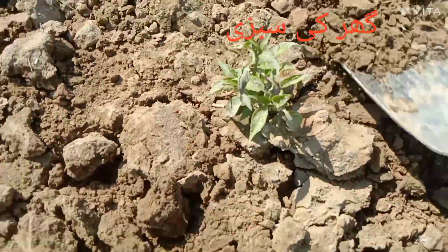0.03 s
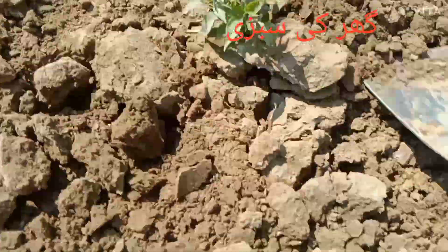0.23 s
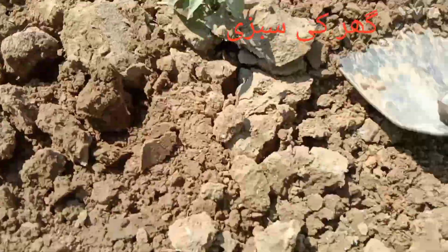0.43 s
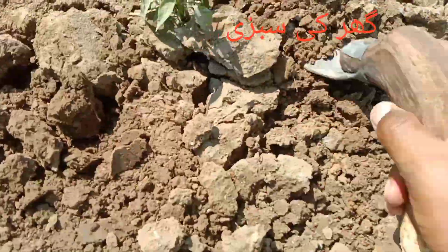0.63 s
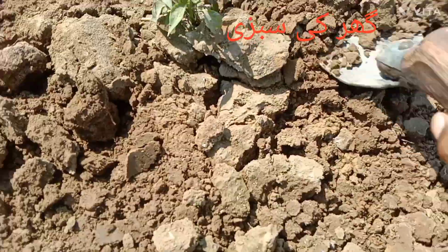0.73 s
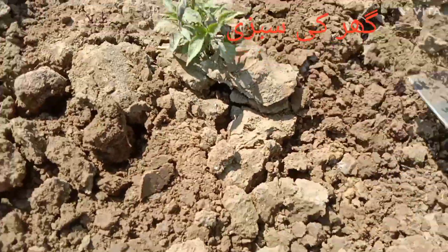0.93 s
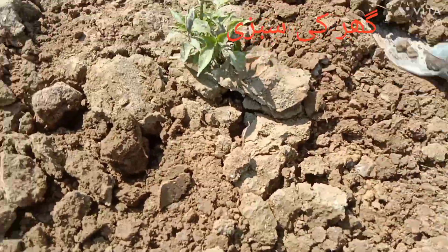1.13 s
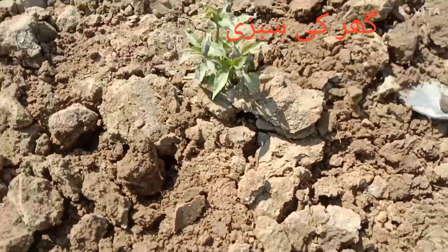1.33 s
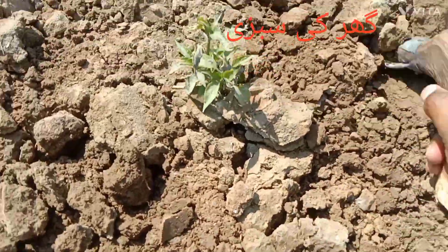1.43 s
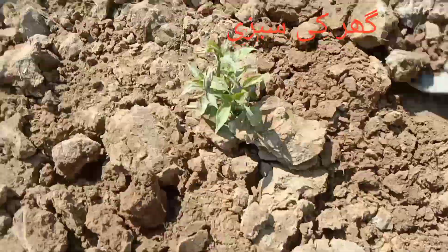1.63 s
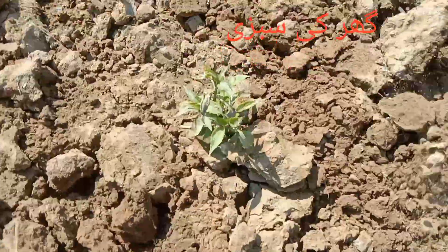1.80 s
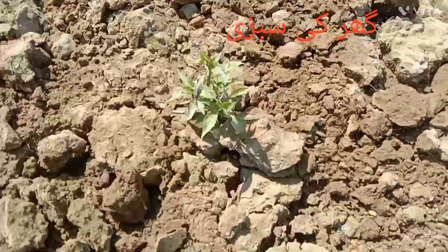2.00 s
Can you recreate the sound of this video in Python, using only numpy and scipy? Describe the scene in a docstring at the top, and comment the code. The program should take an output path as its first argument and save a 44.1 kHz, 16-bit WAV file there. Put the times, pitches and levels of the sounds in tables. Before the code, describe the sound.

Close up, a steel hand hoe rasps through dry garden soil in short irregular strokes, the blade ringing thinly, stones snapping and clods crunching, over a very faint low outdoor rumble; close single microphone.

```python
"""In the open air, close by, a steel hand hoe works dry, cloddy garden soil in short, uneven strokes.
Random grains, filtered into rasp, crunch and fizz, follow each stroke and excite the blade's partials.
Filtered noise bursts are the snaps of small stones and the hollow crunches of breaking clods.
Knocks set off freely decaying partials, and catches of the edge sing as single swelling sines.
Low-pitched grains make the soft thud of shoved soil; noise makes a faint low rumble underneath."""
import sys
import numpy as np
from scipy import signal
from scipy.fft import rfft, irfft
from scipy.io import wavfile

SR = 44100
rng = np.random.default_rng(int(sys.argv[2]) if len(sys.argv) > 2 else 0)


def dump_mix(stems):
    """Bounce the given channels to the path in sys.argv[1] as a 16-bit WAV at rate SR."""
    frames = np.atleast_2d(stems).T  # one column per channel
    limited = np.clip(frames, -1, 1)  # hard clip at full scale
    pcm = np.round(limited * 32767).astype(np.int16)
    wavfile.write(sys.argv[1], SR, pcm)


N = 90890  # samples

# Strokes of the hoe: (full contact from [s], held for [s], rise [s per 20 dB], fall [s per 20 dB],
# rasp level [dB], crunch level [dB], blade ring level [dB])
STROKES = [ (0.003, 0.060, 0.020, 0.030, -53, -62, -47), (0.072, 0.029, 0.008, 0.020, -40, -44, -35),
           (0.124, 0.007, 0.008, 0.018, -38, -49, -44), (0.150, 0.065, 0.020, 0.095, -56, -62, -57),
           (0.303, 0.013, 0.014, 0.018, -45, -47, -56), (0.358, 0.023, 0.010, 0.020, -40, -46, -44),
           (0.394, 0.012, 0.045, 0.010, -29, -38, -35), (0.443, 0.083, 0.030, 0.020, -36, -46.5, -42),
           (0.535, 0.032, 0.010, 0.018, -39, -53, -52), (0.655, 0.055, 0.062, 0.115, -37.5, -72, -48),
           (0.786, 0.088, 0.045, 0.032, -35.5, -45, -41), (0.936, 0.089, 0.012, 0.025, -48.5, -73, -58),
           (1.084, 0.028, 0.036, 0.034, -43, -52, -38), (1.168, 0.012, 0.024, 0.034, -50, -55, -42),
           (1.237, 0.038, 0.002, 0.022, -39.5, -47.5, -41.5), (1.332, 0.026, 0.016, 0.015, -38, -51, -45),
           (1.362, 0.018, 0.008, 0.010, -30, -42, -37), (1.388, 0.019, 0.010, 0.015, -26, -38, -36),
           (1.418, 0.044, 0.015, 0.062, -32, -47, -37), (1.548, 0.032, 0.055, 0.048, -49, -74, -49),
           (1.726, 0.010, 0.003, 0.033, -40, -49, -52), (1.785, 0.025, 0.005, 0.030, -51, -63, -51),
           (1.842, 0.088, 0.045, 0.036, -38, -48, -48), (2.015, 0.045, 0.040, 0.030, -44, -55, -44)]
# The blade shoves soil aside: (full level from [s], held for [s], rise [s per 20 dB],
# fall [s per 20 dB], level [dB])
SHOVES = [(0.165, 0.015, 0.25, 0.02, -64), (0.398, 0.13, 0.03, 0.02, -56), (0.775, 0.1, 0.02, 0.04, -65),
          (1.388, 0.02, 0.025, 0.1, -46)]
# Small stones crack: (time [s], level [dB], pitch [Hz], twice the time to the peak [s])
STONE_SNAPS = [(0.0808, -30, 5000, 0.004), (0.1240, -33, 15600, 0.008), (0.1240, -40, 3400, 0.006),
               (0.1980, -34.5, 5500, 0.0008), (0.2944, -33, 2200, 0.0015), (0.4228, -20, 15700, 0.002),
               (0.4775, -28, 6000, 0.003), (0.4895, -27, 6000, 0.001), (0.5132, -18, 5200, 0.0013),
               (0.5280, -17, 5700, 0.0015), (0.5280, -26, 2400, 0.0013), (0.7405, -34, 4000, 0.001)]
# Clods break with a hollow crunch: (time [s], level [dB], pitch [Hz], twice the time to the peak [s])
CLOD_BREAKS = [(0.088, -45, 1000, 0.014), (0.295, -46, 640, 0.010), (0.774, -50, 640, 0.026),
               (1.362, -40, 880, 0.016), (1.390, -33, 1000, 0.007)]
# The blade is knocked and rings freely: (time [s], level [dB], brightness [dB per octave])
KNOCKS = [(0.127, -37, 12), (0.2946, -33, 1), (0.304, -32, -3)]
# The edge catches and sings: (time [s], level [dB], pitch [Hz], twice the time to the peak [s])
SINGS = [(0.138, -48, 5228, 0.06), (1.103, -32, 4922, 0.011), (1.532, -44, 2934, 0.034)]
# Partials of the steel blade: (frequency [Hz], relative level when rubbed [dB],
# relative level when knocked [dB], free decay time by 60 dB [s])
BLADE_PARTIALS = [(785, -21, -19, 0.07), (1400, -17, -7, 0.04), (1635, -9, -7, 0.12), (2940, -1, -14, 0.08),
                  (3135, -14, 0, 0.06), (3500, -10, -12, 0.05), (4922, 0, -30, 0.06), (5232, -8, -5, 0.09),
                  (5520, -2, -28, 0.05), (7248, -13, -12, 0.13)]
# Relative spectra of grit, crumbs, fine dust, shoved earth and rumble: (frequency [Hz], level [dB per Hz])
RASP_SPECTRUM = [(500, -58), (1400, -23), (3100, -14), (4100, -16), (5000, -4), (5800, 0), (7100, -7),
                 (8400, -30), (17000, -52)]
CRUNCH_SPECTRUM = [(100, -15), (540, -15), (840, 1), (1550, 2), (3500, -5), (8000, -34)]
FIZZ_SPECTRUM = [(8800, -30), (10200, -17), (12700, -24), (14500, -6), (15600, 0), (16500, -18)]
THUD_SPECTRUM = [(30, -30), (110, 0), (330, -2), (1800, -48)]
RUMBLE_SPECTRUM = [(28, -40), (88, 0), (170, -16), (400, -25), (5500, -33), (9000, -48)]

RUMBLE_DB, RUMBLE_SWELL_DB = -66, 4.5
RASP_PER_S, CRUNCH_PER_S, FIZZ_PER_S = 5500, 1600, 8000  # mean grain rates
GRAIN_SPREAD_DB, JUDDER_DB, JUDDER_HZ = 4.2, 1.5, 130
DRAG_DB = -66  # the blade never quite leaves the soil
FIZZ_DB = -2.7
# With ring this far over crunch the blade is half free; soil shortens its ring
FREE_RING_DB, BURIED_T60_SHARE = 11, 0.2
RING_RISE_S = 0.001  # time constant
PATCH_DB, PATCH_HZ, PATCH_S = 4.2, 190, 0.085  # depth and smoothing scales of the resonances
SNAP_WIDTH_HZ, CLOD_WIDTH_HZ = 1200, 130  # from the pitch to half gain
CUTOFF_HZ = 16100


def amp(db):
    """A level in decibels is twenty times the logarithm of the gain."""
    return 10 ** (np.asarray(db) / 20)


def unit(x):
    """Dividing a signal by its root mean square gives it rms 1."""
    return x / np.sqrt(np.mean(x ** 2) + 1e-20)


def add(mix, s, sound):
    """Superposition: a sound is summed into the mix from time s, in place."""
    part = mix[max(round(s * SR), 0):][:len(sound)]
    part += sound[:len(part)]


def colour(x, points, size=4096):
    """Minimum phase: the log gain alone fixes a causal filter, here of unit energy."""
    hz, db = np.transpose(points)
    f = abs(np.fft.fftfreq(size, 1 / SR))
    level_db = np.interp(np.log(f + 1), np.log(hz), db)
    log_gain = np.log(amp(level_db))
    response = np.exp(np.conj(signal.hilbert(log_gain)))
    taps = np.fft.ifft(response).real[:size // 2]
    return signal.fftconvolve(x, taps / np.linalg.norm(taps))[:len(x)]


def wander(hz):
    """Gaussian low-pass filtering turns white noise into smooth chance of rms 1."""
    f = np.fft.rfftfreq(N, 1 / SR)
    spectrum = rfft(rng.standard_normal(N)) * np.exp(-(f / hz) ** 2)
    return unit(irfft(spectrum, N))


def grains(per_s):
    """Granular friction: many small impacts of random time, sign and size."""
    size = amp(GRAIN_SPREAD_DB * np.minimum(rng.exponential(1, N), np.pi))
    sign = rng.choice([-1, 1], N)
    present = rng.random(N) < per_s / SR
    return unit(size * sign * present)


def contact(rows, index):
    """Powers of independent movements add; each rises, holds and falls exponentially."""
    t, power = np.arange(N) / SR, np.zeros(N)
    for row in rows:
        start, hold, rise, fall = row[:4]
        before = np.maximum(start - t, 0) / rise
        after = np.maximum(t - start - hold, 0) / fall
        power += amp(row[index] - 20 * (before + after)) ** 2
    return np.sqrt(power)


def mode(hz, t60):
    """A damped partial is a sine with a quick onset and exponential decay."""
    t = np.arange(SR // 2) / SR
    onset = 1 - np.exp(-t / RING_RISE_S)
    decay = np.exp(-np.log(1000) * t / t60)
    return np.sin(2 * np.pi * hz * t) * onset * decay


def swell(t, length):
    """Critically damped growth and decay: the curve peaks at 1 at half the length."""
    u = 2 * t / length
    return u * np.exp(1 - u)


def background():
    """Filtered noise with a wandering level gives a faint, lumpy outdoor rumble."""
    noise = colour(rng.standard_normal(N), RUMBLE_SPECTRUM)
    lumps = amp(RUMBLE_SWELL_DB * wander(hz=14))
    return amp(RUMBLE_DB) * unit(noise * lumps)


def rubbed(force, t60_share):
    """Forced vibration: grains drive the partials, which ring for a share of their free time."""
    steel = sum(amp(db) * unit(mode(hz, t60 * t60_share)) for hz, db, _, t60 in BLADE_PARTIALS)
    impacts = grains(RASP_PER_S) * force
    return signal.fftconvolve(impacts, steel / np.linalg.norm(steel))[:N]


def shifting(x, size=512):
    """Moving contact changes the resonances: narrow bands come and go along the blade."""
    z = signal.stft(x, nperseg=size)[2]
    # Chance gains are smoothed over both frequency and time
    per_hz = np.fft.fftfreq(len(z), SR / size)
    per_s = np.fft.rfftfreq(z.shape[1], size / 2 / SR)
    smooth = np.exp(-(per_hz[:, None] * PATCH_HZ) ** 2 - (per_s * PATCH_S) ** 2)
    chance = np.fft.rfft2(rng.standard_normal(z.shape))
    patches = unit(np.fft.irfft2(chance * smooth, z.shape))
    gain = unit(amp(PATCH_DB * patches))
    return signal.istft(z * gain, nperseg=size)[1][:N]


def scraping():
    """Friction excitation: grit and crumbs under a juddering blade make it ring and raise a dust fizz."""
    judder = unit(amp(JUDDER_DB * wander(JUDDER_HZ)))
    grit = judder * contact(STROKES, index=4)
    crumbs = judder * contact(STROKES, index=5)
    bite = judder * contact(STROKES, index=6)
    grit = np.hypot(grit, amp(DRAG_DB))
    rasp = colour(grains(RASP_PER_S) * grit, RASP_SPECTRUM)
    crunch = colour(grains(CRUNCH_PER_S) * crumbs, CRUNCH_SPECTRUM)
    dust = np.cbrt(grit ** 2 * crumbs)
    fizz = amp(FIZZ_DB) * colour(grains(FIZZ_PER_S) * dust, FIZZ_SPECTRUM)
    # The ring's power is shared between free and buried steel
    depth = np.arctan2(amp(FREE_RING_DB) * crumbs, bite)
    free = rubbed(bite * np.cos(depth), 1)
    buried = rubbed(bite * np.sin(depth), BURIED_T60_SHARE)
    return shifting(rasp + crunch + fizz + buried) + free


def cracks(rows, width_hz, size=4096):
    """Brittle fracture: each piece breaks in a short band of noise around its own pitch."""
    out, t, f = np.zeros(N), np.arange(size) / SR, np.fft.rfftfreq(size, 1 / SR)
    for s, db, hz, length in rows:
        shape = swell(t, length)
        band = 1 / (1 + (((f - hz) / width_hz) ** 2) ** 2)
        burst = irfft(rfft(rng.standard_normal(size)) * band) * shape
        # The burst takes the energy of its envelope
        add(out, s, amp(db) * burst * np.linalg.norm(shape) / np.linalg.norm(burst))
    return out


def knocks():
    """Free vibration: the blade meets a hard clod and its partials ring on."""
    out, centre_hz = np.zeros(N), 3000
    for s, db, bright in KNOCKS:
        for hz, _, level, t60 in BLADE_PARTIALS:
            octaves = min(np.log2(hz / centre_hz), 1)  # the tilt stops one octave up
            add(out, s, amp(db + level + bright * octaves) * mode(hz, t60))
    return out


def singing():
    """Single-mode vibration: the edge catches and one partial swells and dies away."""
    out, t = np.zeros(N), np.arange(SR // 2) / SR
    for s, db, hz, length in SINGS:
        add(out, s, amp(db) * swell(t, length) * np.sin(2 * np.pi * hz * t))
    return out


def shoving():
    """Many low-pitched grain impacts merge into the dull tumble of displaced earth."""
    return colour(grains(CRUNCH_PER_S) * contact(SHOVES, index=-1), THUD_SPECTRUM)


def scene():
    """Linear superposition joins the hoe, the soil and the open air in one channel."""
    breaking = cracks(STONE_SNAPS, SNAP_WIDTH_HZ) + cracks(CLOD_BREAKS, CLOD_WIDTH_HZ)
    mix = background() + scraping() + breaking + knocks() + singing() + shoving()
    return mix[None]


def record(dry):
    """Band limiting: a linear-phase low-pass filter removes the highest treble."""
    taps = signal.firwin(511, CUTOFF_HZ, window=("kaiser", 9), fs=SR)
    return signal.oaconvolve(dry, taps[None], "same")


dry = scene()
out = record(dry)
dump_mix(out)
```